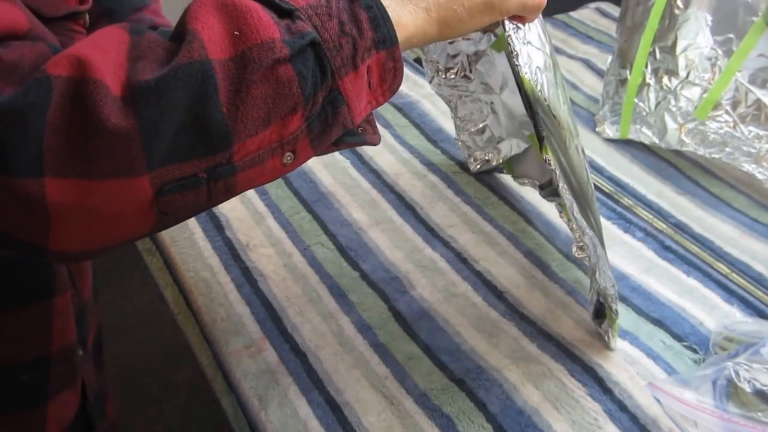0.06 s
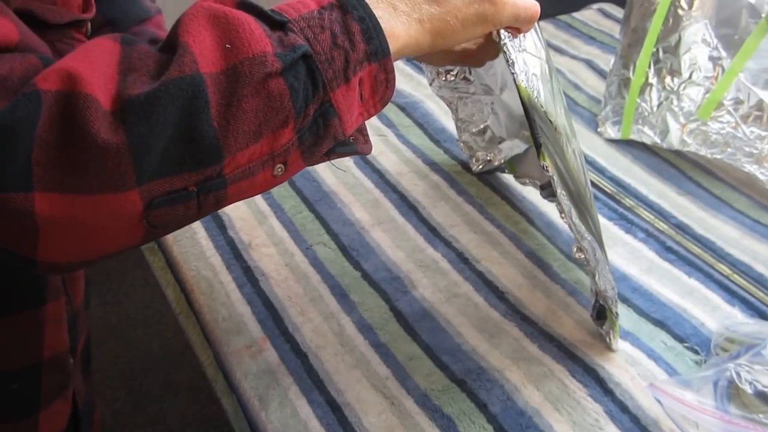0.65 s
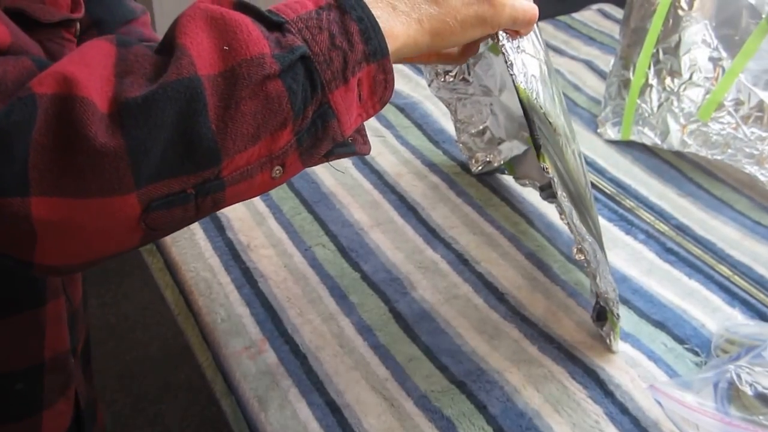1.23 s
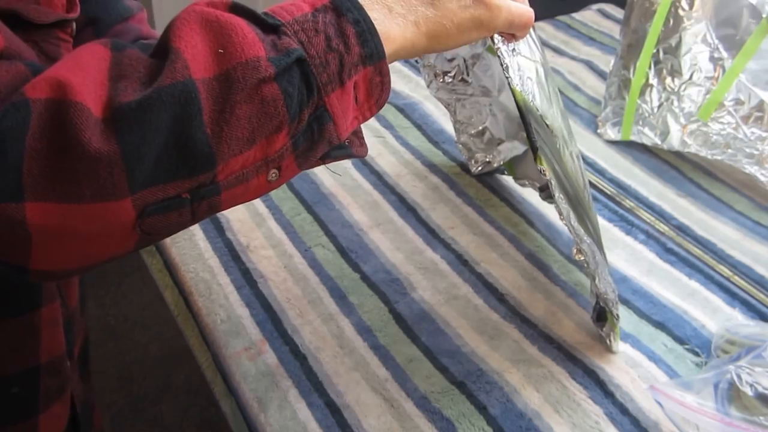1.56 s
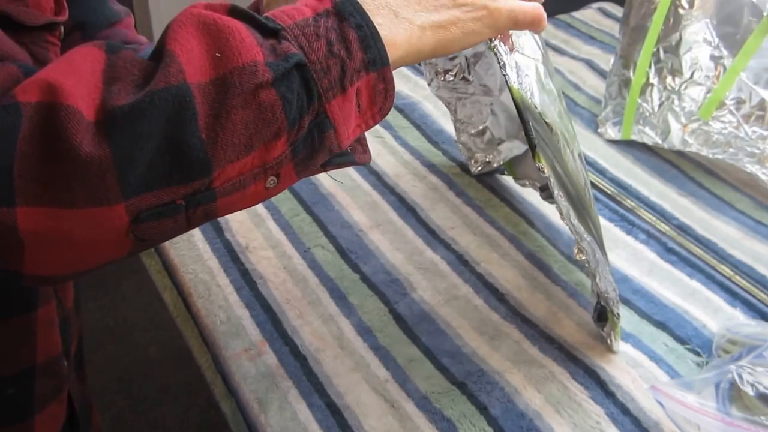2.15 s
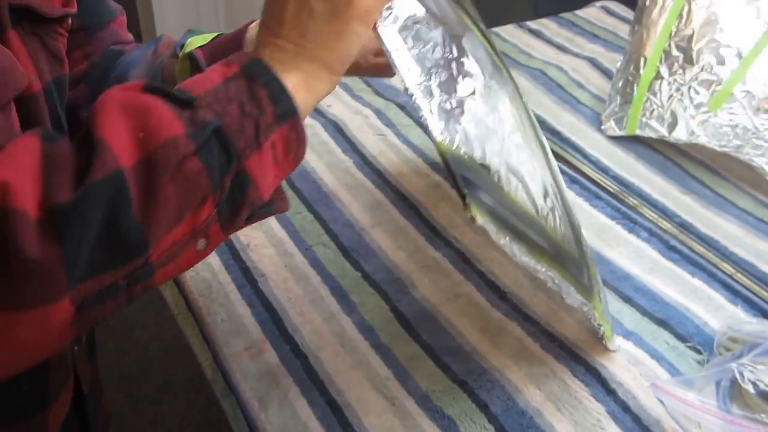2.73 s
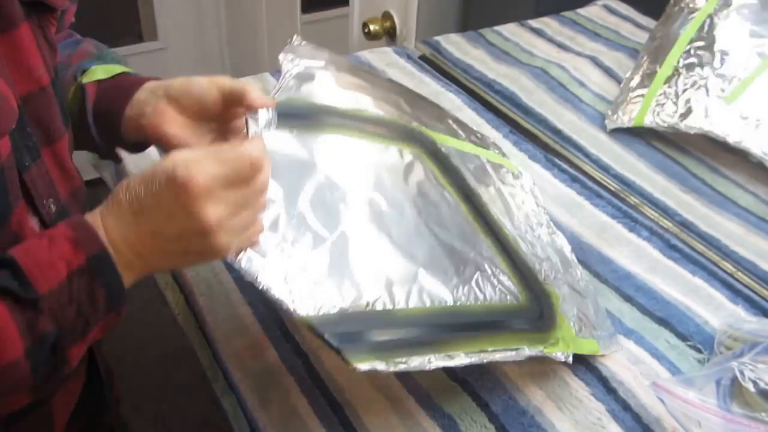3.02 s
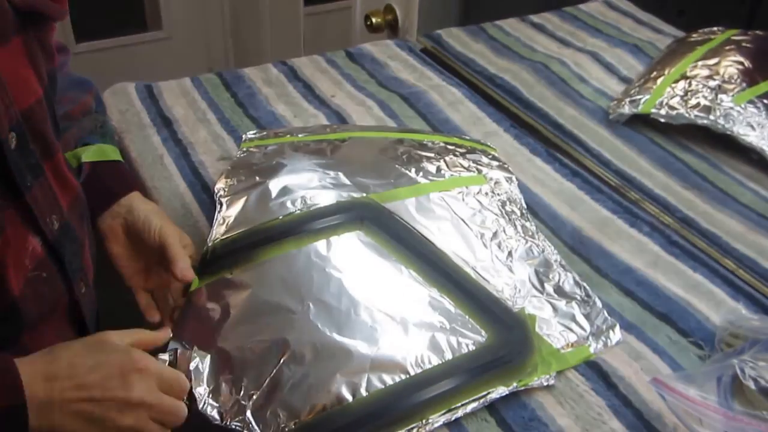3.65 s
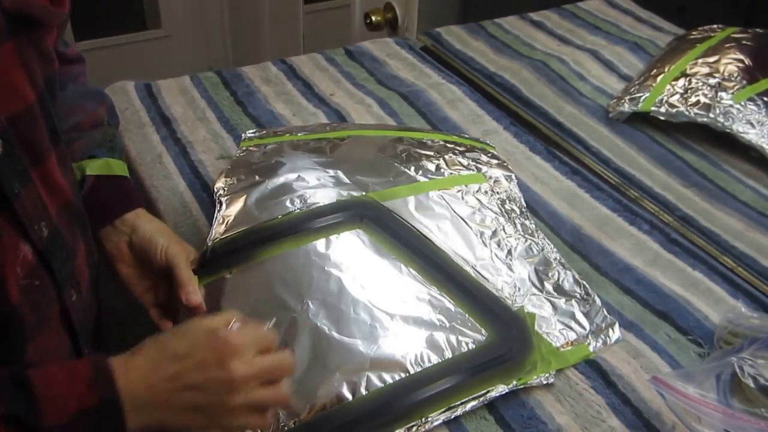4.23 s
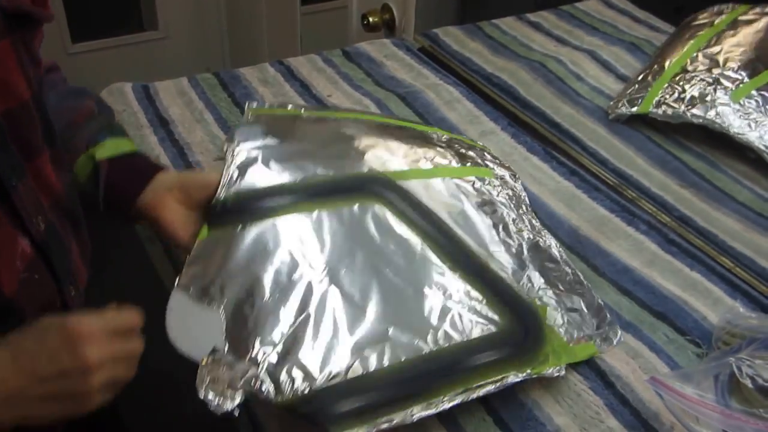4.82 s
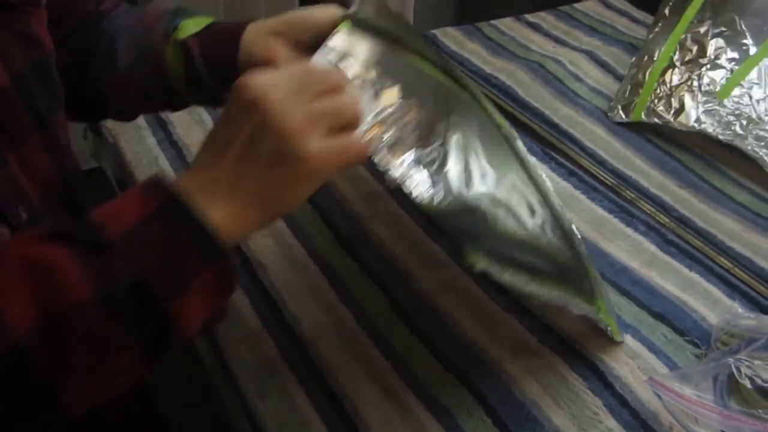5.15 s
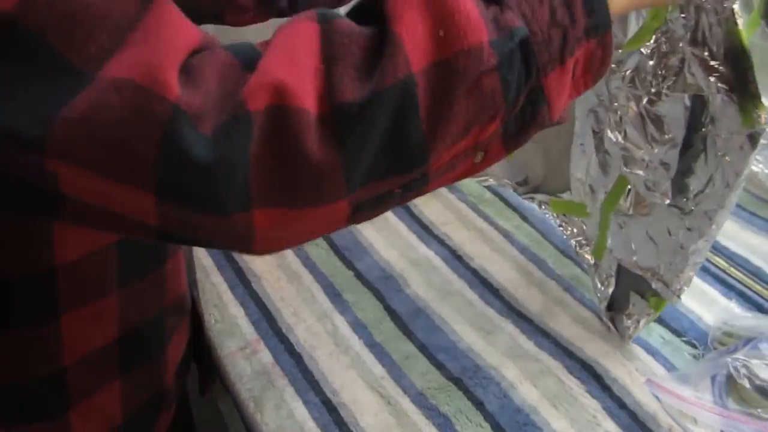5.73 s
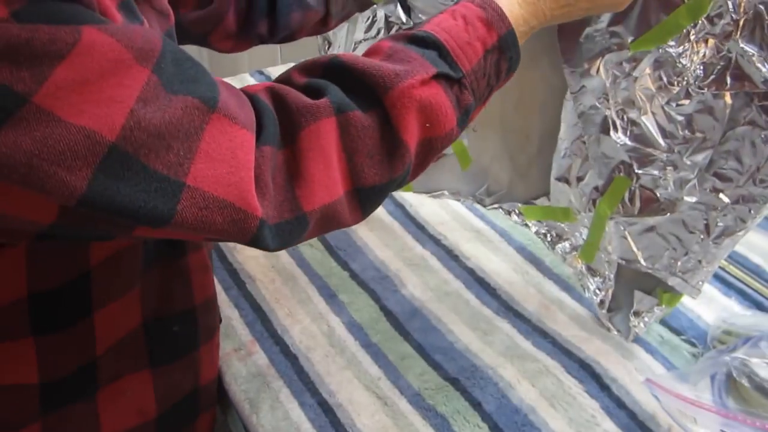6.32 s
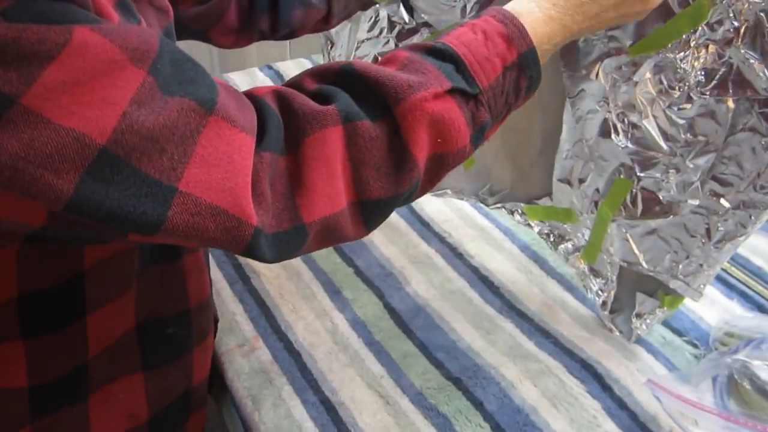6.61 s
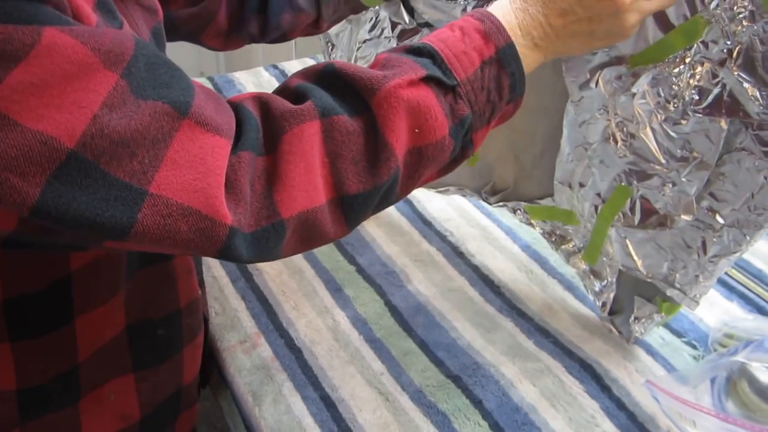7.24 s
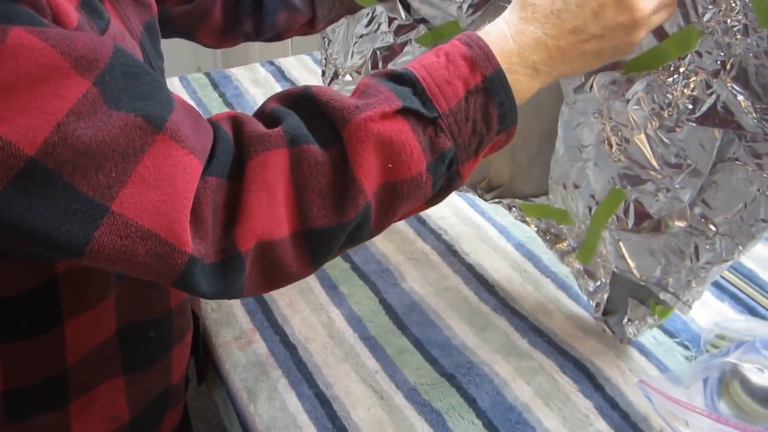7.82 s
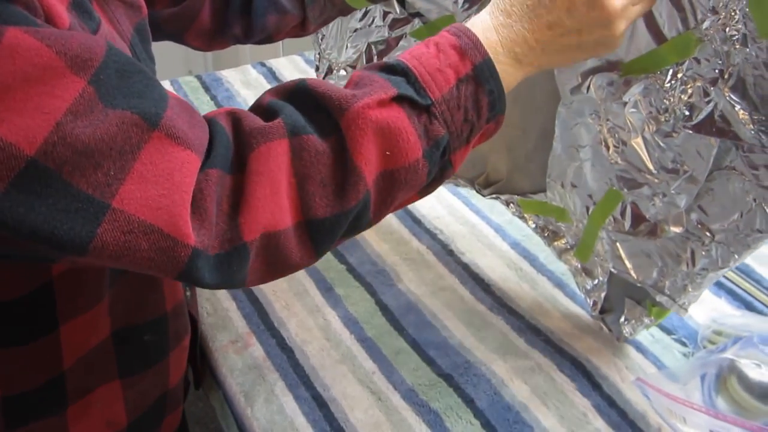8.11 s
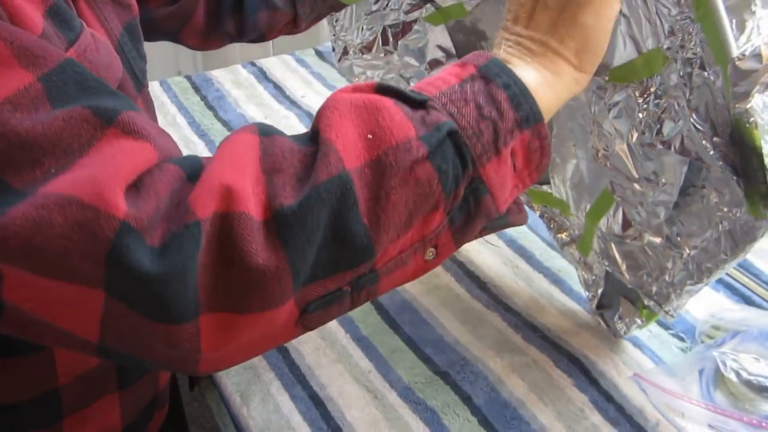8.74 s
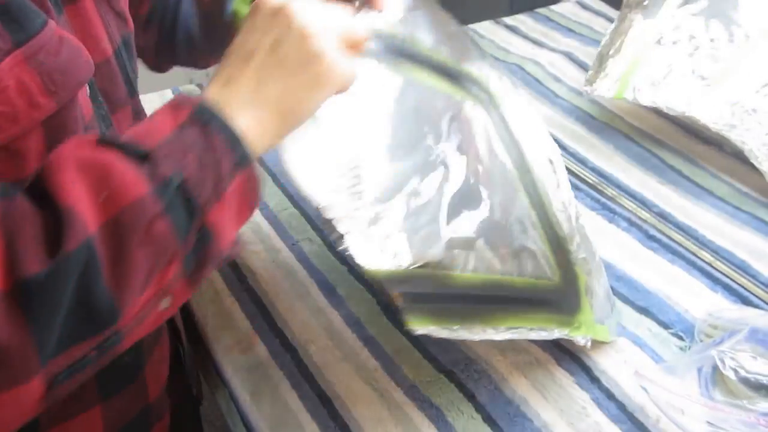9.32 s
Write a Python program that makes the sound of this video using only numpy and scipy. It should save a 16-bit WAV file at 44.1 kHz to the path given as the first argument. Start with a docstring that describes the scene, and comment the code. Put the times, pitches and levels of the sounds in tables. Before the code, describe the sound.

Aluminium foil crinkles and crackles in irregular bursts as hands pull at it, with a few dull bumps on a table.

```python
"""Aluminium foil crinkles as hands pull at it, taped over a painted window panel on a cloth-covered table.
Each pull sets off a swarm of tiny buckles; creases snap singly, broad facets pop lower, taut foil sings.
The panel bumps and scuffs dully over the cloth, and soft landings thud on the table.
A small room answers; under it lie a low rumble, hiss and a faint high whine. Twice the level dips."""
import sys
import numpy as np
from scipy import signal
from scipy.fft import rfft, irfft, next_fast_len
from scipy.io import wavfile
from scipy.ndimage import uniform_filter1d

SR = 44100
rng = np.random.default_rng(int(sys.argv[2]) if len(sys.argv) > 2 else 0)


def bounce(signal):
    """Save signal as a 16-bit WAV file at the path given by the first command-line argument."""
    frames = np.transpose(np.atleast_2d(signal))
    limited = np.clip(frames, -1, 1)
    pcm = np.round(limited * 32767).astype(np.int16)
    wavfile.write(sys.argv[1], SR, pcm)


N = 413216
TIME = np.arange(N) / SR
TOP_HZ = 16000


def amp(db):
    return 10 ** (np.asarray(db) / 20)


def unit(x):
    return x / np.sqrt(np.mean(x ** 2) + 1e-20)


def along(points, hz):
    """Read (freq_hz, value) points on a log frequency axis."""
    freqs, values = np.transpose(points)
    return np.interp(np.log(hz + 1), np.log(freqs + 1), values)


def automation(points):
    """Draw (time_s, value) points as one value per sample."""
    return np.interp(TIME, *np.transpose(points))


def add(track, start_s, sound):
    """Mix a sound into the track."""
    part = track[max(0, round(start_s * SR)):][:len(sound)]
    part += sound[:len(part)]


def equalise(x, spectrum):
    """Minimum-phase EQ of unit power, shaped like the spectrum."""
    size = 2 * next_fast_len(N // 2 + 8192)
    gain = unit(amp(along(spectrum, np.fft.rfftfreq(size, 1 / SR))))
    cepstrum = irfft(np.log(gain))
    cepstrum[1:size // 2] *= 2
    cepstrum[size // 2 + 1:] = 0
    return irfft(rfft(x, size) * np.exp(rfft(cepstrum)))[:N]


def noise(spectrum):
    """Coloured noise of rms 1."""
    return unit(equalise(rng.standard_normal(N), spectrum))


# Colour of the hiss: freq_hz, gain_db
HISS_EQ = [(30, 11.5), (300, 1.5), (700, 4.5), (2000, 3), (6000, -14), (11000, -23), (16000, -8.5)]
def hiss_and_whine():
    """A steady bed of hiss with a thin band of noise whining near 7.9 kHz."""
    whine = noise([(7000, -33), (7750, 5), (7900, 19), (8050, 8), (8800, -50)])
    return amp(-62) * noise(HISS_EQ) + amp(-72) * whine


# Colour of the rumble: freq_hz, gain_db
RUMBLE_EQ = [(20, 5), (45, -2), (85, -0.5), (135, -5), (270, -3.5), (400, -11), (800, -13.5), (2500, -58)]
# Stirring of arms, sleeves and table: time_s, level_db
STIR = [(0, -55.5), (.6, -55), (1.05, -60.5), (1.35, -53), (1.8, -58), (3.1, -60), (3.4, -56.5),
        (3.85, -59.5), (4.15, -50), (4.35, -62.5), (4.7, -51.5), (4.95, -56.5), (5.7, -55), (6.35, -48.5),
        (6.68, -63.5), (7.05, -54), (8.0, -56), (8.75, -58), (9.37, -56.5)]
def arm_rumble(broad_db, follow=.074, smooth_s=.08):
    """Arms, sleeves and table rumble, a little more when the sheet is worked harder."""
    effort_db = uniform_filter1d(broad_db - broad_db.mean(), size=int(smooth_s * SR))
    return amp(automation(STIR) + follow * effort_db) * noise(RUMBLE_EQ)


# Decay of the small room: freq_hz, t60_s
ROOM_DECAY = [(150, 0.55), (1000, 0.26), (4000, 0.37), (9000, 0.21), (16000, 0.09)]
def room(x, tail_db, blocks=48):
    """The walls answer softly; a fresh tail for each block stands for paths changing as the foil moves."""
    out, hop = np.zeros(N), N // blocks + 1
    for start in range(0, N, hop):
        hz, t, bands = signal.stft(rng.standard_normal(SR // 3), SR, nperseg=256)
        decay = amp(-60 * t / along(ROOM_DECAY, hz)[:, None])
        tail = signal.istft(bands * decay, SR, nperseg=256)[1]
        tail *= 1 - np.exp(-np.arange(len(tail)) / SR / .001)
        add(out, start / SR, signal.fftconvolve(x[start:start + hop], tail / np.linalg.norm(tail)))
    return x + amp(tail_db) * out


# Hand or panel lands on the padded table: start_s, level_db, pitch_hz
LANDINGS = [(0.454, -36, 214.3), (0.755, -30.5, 197), (2.306, -34, 220), (3.371, -41, 74.5),
            (3.41, -44, 40), (3.42, -43, 89), (4.67, -45, 74), (5.091, -42, 100)]
def table_thuds():
    """A soft landing rocks the table for a few cycles."""
    out, t = np.zeros(N), np.arange(SR // 4) / SR
    for start_s, level_db, pitch_hz in LANDINGS:
        cycles = pitch_hz * t
        envelope = (1 - np.exp(-cycles / .19)) * np.exp(-cycles / 1.33)
        add(out, start_s, amp(level_db + 1) * envelope * np.sin(2 * np.pi * cycles))
    return out


# Resonances of the panel: pitch_hz, gain_db, t60_s
PANEL_MODES = [(166, -4, 0.09), (253.3, 0, 0.19), (283, 1.5, 0.16), (345, -11, 0.066), (430, -16, 0.092),
               (584, -8, .07), (722, -11, 0.09), (860, -27, 0.062)]
# Colour of the panel dragging on cloth: freq_hz, gain_db
SCUFF_EQ = [(100, -21), (200, -5), (350, 4.5), (480, -10.5), (620, -0.5), (850, -2.5), (1200, -6.5),
            (2200, -38.5)]
# Nudges of the panel: start_s, ring_db, scuff_db
NUDGES = [(6.103, -46, -49), (6.221, -30, -40), (6.294, -30.5, -48), (6.329, -39, -43.5), (6.359, -39, -67),
          (6.454, -32.5, -49), (6.509, -53, -62), (6.569, -49, -54), (7.159, -38.5, -53), (7.459, -37, -52),
          (7.494, -40, -67), (7.755, -34.5, -62), (7.89, -37, -48.5), (7.937, -40.5, -46.5),
          (7.98, -35.5, -40.5), (8.016, -34, -54), (8.069, -51, -51), (8.5, -36.5, -61), (8.924, -36, -54)]
def panel_bumps():
    """Each nudge scuffs the panel over the cloth and rings it briefly."""
    out, drag, t = np.zeros(N), np.zeros(N), np.arange(SR // 3) / SR
    for start_s, ring_db, scuff_db in NUDGES:
        ring = np.zeros(len(t))
        for pitch_hz, gain_db, t60_s in PANEL_MODES:
            decay = amp(gain_db + rng.normal(0, 2.6) - 60 * t / t60_s)
            ring += decay * np.sin(2 * np.pi * (pitch_hz * t + rng.random()))
        add(out, start_s, amp(ring_db - 7) * (1 - np.exp(-t / .004)) * ring)
        add(drag, start_s, amp(scuff_db + 3 - 60 * t / .16) * (1 - np.exp(-t / .005)))
    return out + drag * noise(SCUFF_EQ)


def pull_envelope_db(t, length_s, attack_s=.032, release_s=.042, swell_db=1.5):
    """A pull rises, swells as the foil tightens and lets go; attack and release are times per 20 dB."""
    fade = np.maximum(-t, 0) / attack_s + np.maximum(t - length_s, 0) / release_s
    return swell_db * (np.clip(t / length_s, 0, 1) - .5) - 20 * np.minimum(fade, 10)


# Resonances of taut foil: pitch_hz, width_hz, gain_db
TAUT_MODES = [(2090, 65, -10), (3150, 87, 3), (3490, 59, 0), (4180, 31, -11)]
# Slow pulls that make it sing: start_s, length_s, level_db
SINGING_PULLS = [(4.385, 0.04, -51), (4.515, 0.056, -44)]
def foil_singing():
    """Rubbing keeps a few resonances of the taut foil going."""
    rub = rng.standard_normal(N)
    ring = sum(amp(gain_db) * signal.lfilter(*signal.iirpeak(pitch_hz, pitch_hz / width_hz, SR), rub)
               for pitch_hz, width_hz, gain_db in TAUT_MODES)
    envelope = sum(amp(level_db + pull_envelope_db(TIME - start_s, length_s))
                   for start_s, length_s, level_db in SINGING_PULLS)
    return unit(ring) * envelope


# Wide parts of the sheet flip over: start_s, level_db, pitch_hz
FLIPS = [(1.54, -30, 1100), (1.589, -24.5, 2810), (1.795, -18, 1050), (1.922, -23, 1555),
         (2.296, -23.5, 595), (2.629, -25, 820), (2.68, -21, 1050), (2.823, -14, 820), (2.841, -17.5, 1380),
         (6.195, -21, 1366), (6.205, -21, 1150), (6.557, -27.5, 825), (8.071, -28, 1470)]
def facet_pops(overtones=6, t60_s=.029):
    """A wide facet flips: one strong low mode and a scatter of weaker ones above, all short-lived."""
    out, t = np.zeros(N), np.arange(SR // 10) / SR
    for start_s, level_db, pitch_hz in FLIPS:
        upper_hz = pitch_hz * (1 + 1.4 * rng.random((overtones, 1)))
        upper = np.sin(2 * np.pi * (upper_hz * t + rng.random((overtones, 1)))).sum(0)
        ring = np.sin(2 * np.pi * pitch_hz * t) + .28 * upper
        attack = (1 - np.exp(-t / .0014)) ** 2
        add(out, start_s, amp(level_db - 60 * t / t60_s) * attack * ring)
    return out


def scatter(x, smear_s, smear_db):
    """Each tick runs through the crumpled sheet by its own paths and leaves a brief, random wake."""
    pole = np.exp(-1 / (smear_s * SR))
    energy = signal.lfilter([1 - pole], [1, -pole], x ** 2)
    wake = amp(smear_db) * np.sqrt(energy) * rng.standard_normal(N)
    return (x + wake) / np.hypot(1, amp(smear_db))


def flexing(x, depth_db):
    """The sheet's resonances shift as it changes shape: a randomly drifting EQ."""
    bands = signal.stft(x, nperseg=256)[2]
    drift = uniform_filter1d(rng.standard_normal(bands.shape), size=5, axis=0)
    drift = uniform_filter1d(drift, size=6, axis=1)
    gain = unit(amp(depth_db * unit(drift)))
    return signal.istft(bands * gain, nperseg=256)[1][:N]


def sheet_ring(x, ring_db, t60_s, blocks=46, modes=12):
    """Taut stretches ring on after the ticks; fresh modes for each block stand for the sheet bending."""
    out, t, hop = np.zeros(N), np.arange(SR // 6) / SR, N // blocks + 1
    for start in range(0, N, hop):
        pitch_hz = rng.uniform(1400, 5500, (modes, 1))
        ring = np.sin(2 * np.pi * pitch_hz * t).sum(0) * amp(-60 * t / t60_s)
        add(out, start / SR, signal.fftconvolve(x[start:start + hop], ring / np.linalg.norm(ring)))
    return x + amp(ring_db) * out


# Tilt of treble against mids: time_s, tilt_db
BRIGHTNESS = [(0, 0), (1.5, -1.5), (2.2, -2), (2.62, 4.5), (2.95, 5), (3.25, -2.5), (3.5, 3), (3.92, 3.5),
              (4.15, -5), (4.5, 1.5), (5.1, -0.5), (5.9, -1), (7.0, -1), (8.3, -3), (8.9, 1.5), (9.3, 4)]
def turning(x, crossover_hz=6300):
    """The creases sound brighter or duller as the sheet is lifted and turned."""
    tilt_db = automation(BRIGHTNESS)
    mids = signal.sosfiltfilt(signal.butter(3, crossover_hz, fs=SR, output="sos"), x)
    return mids * amp(-tilt_db / 2) + (x - mids) * amp(tilt_db / 2)


# Faint rustle of foil that is only held: time_s, level_db
GRIP_RUSTLE = [(0, -66), (.14, -60.5), (.85, -48), (.96, -56), (.99, -71), (1.2, -68), (1.35, -54),
               (1.9, -59), (2.8, -49), (3.27, -57), (4.33, -59), (4.8, -47), (5.03, -53), (6.0, -48),
               (7.15, -58), (8.1, -51), (8.61, -59), (9.37, -53)]
# The hands bend or pull the foil: start_s, length_s, fine_db, broad_db
HAND_PULLS = [(0, .012, -31, -42), (.22, .06, -32, -46), (0.281, .13, -26, -38), (.44, .06, -28, -40),
              (.52, .07, -35, -48), (.61, .17, -26, -39), (.89, .07, -43, -58), (1.308, .018, -32.5, -45),
              (1.38, .03, -37, -50), (1.64, .04, -44, -55), (1.7, .04, -34.5, -47),
              (1.792, .015, -27, -37.5), (1.935, .025, -36.5, -48), (2.076, .05, -30, -42),
              (2.14, .19, -38, -48), (2.45, .015, -39, -55), (2.565, .04, -36, -44), (2.615, .05, -22, -35),
              (2.69, .035, -38, -46.5), (2.83, .08, -25, -42), (2.95, .22, -24, -39),
              (3.305, .025, -48, -60), (3.36, .03, -35, -48), (3.409, .07, -44, -56), (3.5, .15, -38, -51),
              (3.729, .015, -39.5, -56), (3.87, .05, -23, -42), (3.985, .05, -25.5, -40),
              (4.07, .145, -28, -40), (4.381, .06, -46, -58), (4.5, .07, -31, -45), (4.669, .08, -32, -47),
              (4.821, .08, -36, -47.5), (4.959, .03, -39, -51), (5.08, .12, -37, -50),
              (5.25, .03, -37.5, -47), (5.37, .04, -41, -52), (5.47, .11, -41, -53), (5.7, .055, -34, -47),
              (5.8, .06, -41, -50), (5.885, .035, -33, -47), (6.119, .035, -32.5, -48.5),
              (6.199, .13, -44, -45), (6.45, .08, -40, -52), (6.562, .03, -21, -37),
              (6.64, .06, -36.5, -51), (6.829, .02, -37, -48), (6.882, .06, -46.5, -56),
              (6.965, .025, -32, -43), (7.33, .07, -39, -50), (7.411, .05, -32.5, -46.5),
              (7.547, .05, -48, -60), (7.699, .08, -42, -52.5), (7.84, .22, -43, -49),
              (7.975, .025, -33, -41.5), (8.278, .12, -42, -53), (8.459, .07, -38, -48),
              (8.689, .16, -34, -48), (8.91, .2, -38, -53), (9.139, .18, -45, -55)]
def handling():
    """Rustle levels in dB for fine creases and broad facets: the pulls ride over the grip."""
    grip_db = automation(GRIP_RUSTLE)
    power = amp([grip_db, grip_db - 8]) ** 2  # held facets are quieter than held creases
    for start_s, length_s, fine_db, broad_db in HAND_PULLS:
        near = slice(max(0, int((start_s - .2) * SR)), int((start_s + length_s + .4) * SR))
        shape_db = pull_envelope_db(TIME[near] - start_s, length_s)
        power[:, near] += amp([fine_db + shape_db, broad_db + shape_db]) ** 2
    return 10 * np.log10(power)


def buckles(starts, sizes, ring_s, length):
    """Each buckle is a tick that rings its own patch of foil for an instant."""
    offsets = np.arange(128)
    t = offsets / SR
    pitch, life, phase = rng.random((len(starts), 3)).T[:, :, None]
    grains = np.exp(-t / (ring_s * (.5 + life))) * np.cos(2 * np.pi * (pitch * TOP_HZ * t + phase))
    grains *= sizes[:, None] / np.linalg.norm(grains, axis=1, keepdims=True)
    return np.bincount((starts[:, None] + offsets).ravel(), grains.ravel(), length)[:length]


def swarm(level_db, base_per_s, spread_db, clump_db, avalanches_per_s=180):
    """Buckles come in avalanches, and more of them the harder the foil is bent."""
    per_s = np.clip(base_per_s * amp(.4 * (level_db - np.mean(level_db))), 0, 8000)
    starts = np.flatnonzero(rng.random(N) < per_s / SR)
    avalanche = np.cumsum(rng.random(N) < avalanches_per_s / SR)
    size_db = spread_db * np.clip(rng.standard_normal(N), -2, 2)
    size_db += clump_db * rng.standard_normal(N)[avalanche]
    ticks = buckles(starts, amp(size_db[starts]), ring_s=.0001, length=N)
    # the hand's work sets the energy released over a few hundredths of a second
    power = np.abs(uniform_filter1d(uniform_filter1d(ticks ** 2, size=1300), size=700))
    return amp(level_db) * ticks / np.sqrt(power + .001 * np.mean(power))


def stray_creases(fine_db, broad_db, per_s=14, ceiling_db=-33, t60_s=.022):
    """Cues for lesser creases that snap at random, a little above the rustle but held to a ceiling."""
    starts = np.flatnonzero(rng.random(N) < per_s / SR)
    over_db = np.minimum(4 + 1.5 * rng.uniform(-.89, 1, N), ceiling_db - fine_db)
    return [(i / SR, fine_db[i] + over_db[i], broad_db[i] + over_db[i], t60_s) for i in starts]


# Creases that snap through: start_s, fine_db, broad_db, t60_s
CREASE_SNAPS = [(.0855, -33, -69, 0.036), (.1511, -27, -44, .14), (.1968, -28, -41.5, .12),
                (.3189, -28.5, -35, .08), (.3872, -23, -29.5, 0.11), (.4514, -17, -24.5, 0.091),
                (.6338, -21.5, -32.5, 0.033), (.719, -24, -28, 0.048), (.7542, -15, -21, 0.043),
                (.918, -27, -44, 0.032), (1.233, -40, -48, 0.025), (1.2999, -24, -50, .046),
                (1.3655, -33, -54, .022), (1.4084, -26, -44, 0.049), (1.4543, -36, -52, .03),
                (1.4902, -34, -55.5, 0.039), (1.5408, -28, -33, 0.081), (1.589, -39.5, -44, 0.084),
                (1.6717, -26.5, -51.5, .054), (1.72, -24, -32.5, 0.058), (1.7676, -28, -31, 0.072),
                (1.7865, -25, -33, 0.021), (1.7947, -35, -26.5, 0.0257), (1.834, -23, -42, 0.037),
                (1.872, -32, -53, .028), (1.9214, -39, -29, 0.026), (1.9334, -23.5, -23.5, 0.017),
                (1.9528, -22, -40, .013), (2.043, -23.5, -43, 0.044), (2.0616, -18, -38, .035),
                (2.0719, -25, -41, .04), (2.1088, -19, -40.5, .056), (2.198, -30, -43, 0.048),
                (2.216, -27, -36, .1), (2.2933, -21, -31, .033), (2.342, -26.5, -52, .03),
                (2.451, -35, -50.5, 0.043), (2.503, -33, -41.5, .049), (2.5842, -27, -38, 0.055),
                (2.7555, -17, -31.5, 0.054), (2.8197, -23.5, -38, .12), (2.846, -25, -32, 0.094),
                (2.9916, -14, -33, 0.016), (3.0756, -17, -45, 0.021), (3.1312, -21, -25.5, 0.041),
                (3.172, -15.5, -31.5, .06), (3.266, -32.5, -45, .015), (3.364, -27, -54, 0.15),
                (3.4218, -33, -36, .035), (3.494, -22.5, -57, 0.017), (3.5154, -21, -60, .02),
                (3.601, -44, -37, .03), (3.792, -22, -39, .064), (3.8606, -33, -34.5, 0.14),
                (4.036, -14.5, -33, 0.029), (4.0965, -20, -28.5, 0.061), (4.1766, -15.5, -32, 0.029),
                (4.212, -35, -29, 0.036), (4.494, -22.5, -50, 0.024), (4.547, -25, -52, .07),
                (4.653, -27, -35.5, .059), (4.8213, -24, -34.5, .04), (4.8885, -26, -41, .036),
                (5.0687, -27.5, -36.5, .08), (5.26, -14.5, -47, 0.0055), (5.4524, -23.5, -56, 0.047),
                (5.5, -16.5, -35, .035), (5.5759, -29, -40, 0.15), (5.6525, -30, -40.5, 0.14),
                (5.841, -25.5, -55, 0.031), (5.898, -22.5, -46, .09), (6.0293, -29.5, -34, .026),
                (6.0516, -32, -34, .066), (6.1925, -26.5, -30, .085), (6.436, -22, -58, 0.081),
                (6.5535, -23.5, -40, .083), (6.8213, -27, -40, 0.03), (6.8374, -24, -50, 0.068),
                (6.9658, -22.5, -53, 0.087), (6.9775, -21.5, -40.5, .091), (7.258, -30.5, -60, 0.011),
                (7.283, -29.5, -39.5, .055), (7.3839, -23.5, -36, 0.022), (7.4532, -17.5, -30.5, .067),
                (7.4946, -20, -42.5, .015), (7.6387, -27, -33.5, 0.022), (7.757, -25.5, -34, 0.022),
                (7.8225, -24.5, -46, .077), (7.8923, -25.5, -53, 0.033), (7.9763, -21.5, -39, 0.088),
                (8.074, -38, -38.5, .034), (8.191, -30, -54, .013), (8.2356, -35, -34, 0.016),
                (8.349, -26, -48.5, 0.017), (8.405, -30, -47.5, .025), (8.4312, -31, -38, .041),
                (8.5104, -23, -33.5, 0.024), (8.61, -46, -43, 0.028), (8.646, -36, -51, 0.023),
                (8.6749, -30.5, -44.5, 0.11), (8.8398, -17.5, -35, 0.021), (8.9036, -23.5, -47, .04),
                (8.9483, -27, -50, .07), (9.0387, -16, -50, .012), (9.1414, -32, -46, .076),
                (9.1995, -34.5, -59, .041), (9.2882, -26.5, -41, 0.031), (9.3104, -24.5, -57, 0.064)]
def crease_snaps(strays, count=44, build_s=.0011):
    """A crease gives way in a run of buckles that builds at once and then fades."""
    fine, broad = np.zeros(N), np.zeros(N)
    for start_s, fine_db, broad_db, t60_s in CREASE_SNAPS + strays:
        progress = (np.arange(count) + rng.uniform(-.46, .5, count)).clip(0) / count
        starts = (progress * .6 * t60_s * SR).astype(int)
        sizes = amp(-36 * progress + 2.4 * rng.standard_normal(count))
        sizes *= 1 - .57 * np.exp(-starts / (build_s * SR))
        energy = t60_s * SR / np.log(10 ** 6)  # of a unit decay with this t60
        for track, level_db, ring_s in (fine, fine_db, .00008), (broad, broad_db, .00005):
            run = buckles(starts, sizes, ring_s, SR // 5)
            add(track, start_s, amp(level_db) * np.sqrt(energy) * run / np.linalg.norm(run))
    return fine, broad


# Colour of the fine creases: freq_hz, gain_db
CREASE_EQ = [(500, -32), (1500, -23.5), (2500, -7.5), (4000, -4), (6000, 0.5), (9000, -0.5), (11500, -2.5),
             (13500, -9), (16000, -16.5)]
# Colour of the broad facets: freq_hz, gain_db
FACET_EQ = [(60, -24), (200, -9), (480, -12.5), (800, -4.5), (1150, -4), (1550, -2.5), (2300, 1.5),
            (3300, -1.5), (5500, 0), (14000, -64.5)]
def foil_crinkle(fine_db, broad_db):
    """Fine creases fizz while the broader facets between them crackle lower, with a longer wake."""
    fine, broad = crease_snaps(stray_creases(fine_db, broad_db))
    fine += swarm(fine_db - .5, base_per_s=1700, spread_db=2, clump_db=3.5)
    broad += swarm(broad_db - .5, base_per_s=1200, spread_db=1, clump_db=2)
    fine = equalise(scatter(fine, smear_s=.0011, smear_db=4), CREASE_EQ)
    broad = equalise(scatter(broad, smear_s=.0019, smear_db=1.5), FACET_EQ)
    sheet = flexing(amp(.24) * turning(fine) + amp(1.65) * broad, depth_db=2.5)
    return sheet_ring(sheet, ring_db=-17.5, t60_s=.08)


def scene():
    """Foil, panel and table sound in the room, over the background bed, in mono."""
    fine_db, broad_db = handling()
    foil = foil_crinkle(fine_db, broad_db) + amp(-3.5) * facet_pops() + foil_singing()
    action = room(foil + panel_bumps() + table_thuds(), tail_db=-14.5)
    return (action + hiss_and_whine() + arm_rumble(broad_db))[None]


# Brief dips in level: start_s, end_s, gain_db
LEVEL_DIPS = [(3.7948, 3.861, -22.5), (5.5912, 5.6516, -21.5)]
def record(dry):
    """The level dips twice for a moment; nothing passes above the band limit."""
    gain_db = sum(db * ((TIME > start_s) & (TIME < end_s)) for start_s, end_s, db in LEVEL_DIPS)
    dipped = dry * amp(uniform_filter1d(gain_db, size=16))
    size = next_fast_len(N + 8192)
    passband = np.fft.rfftfreq(size, 1 / SR) < TOP_HZ
    return irfft(rfft(dipped, size) * passband, size)[:, :N]


dry = scene()
out = record(dry)
bounce(out)
```